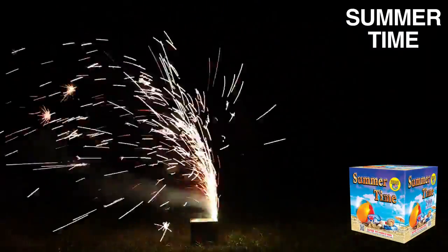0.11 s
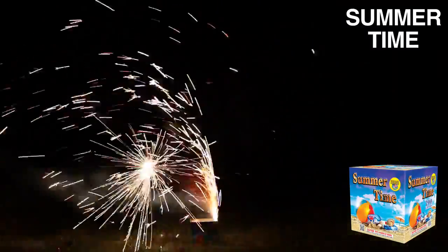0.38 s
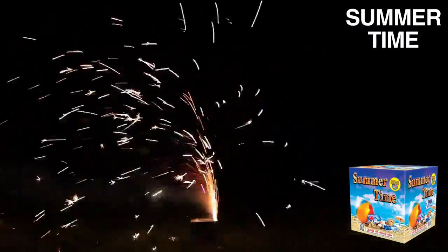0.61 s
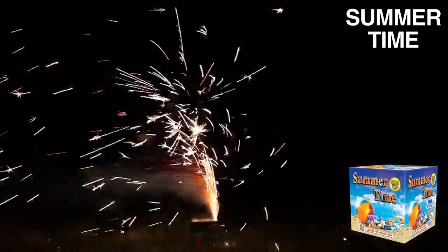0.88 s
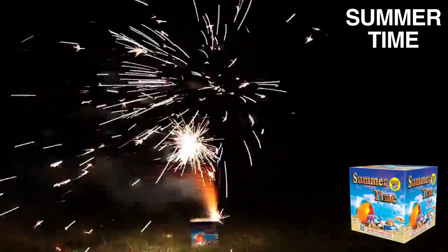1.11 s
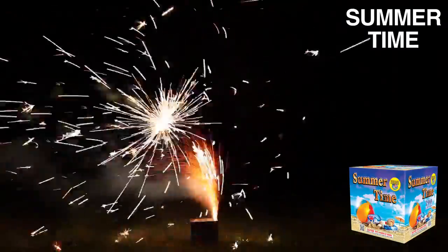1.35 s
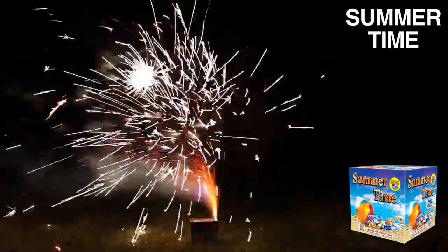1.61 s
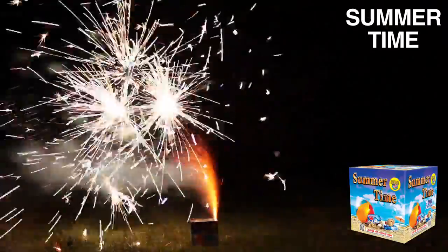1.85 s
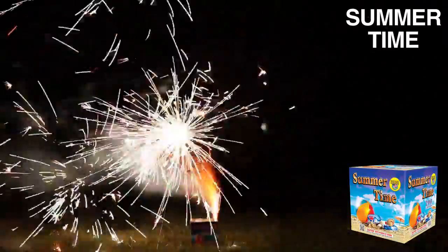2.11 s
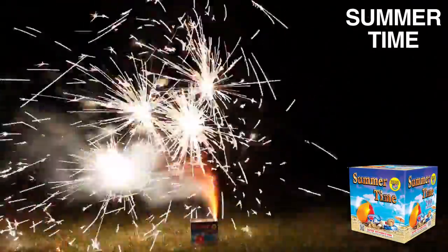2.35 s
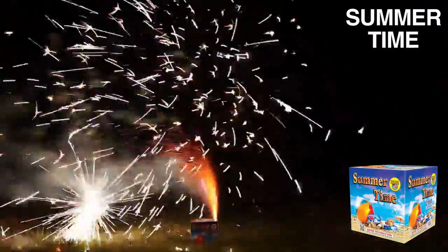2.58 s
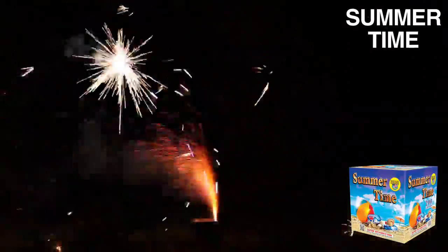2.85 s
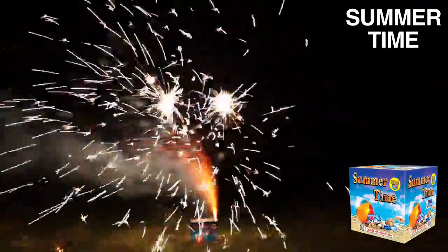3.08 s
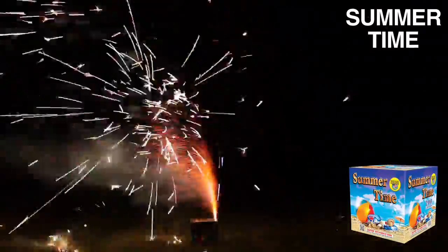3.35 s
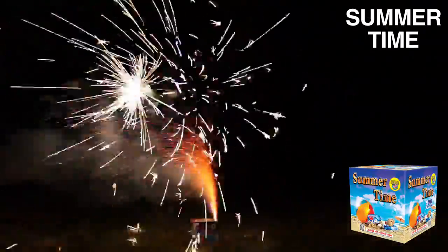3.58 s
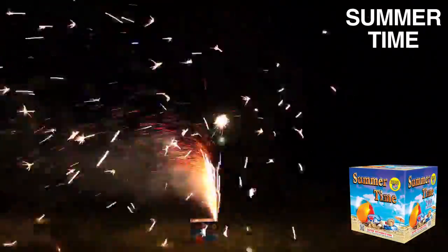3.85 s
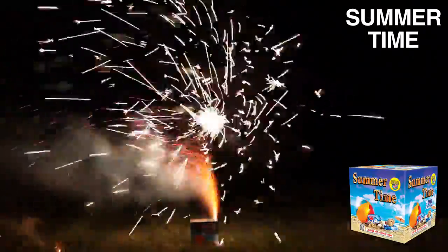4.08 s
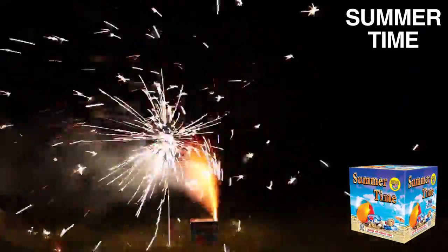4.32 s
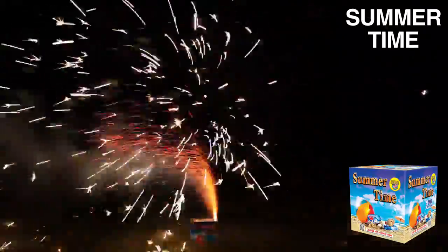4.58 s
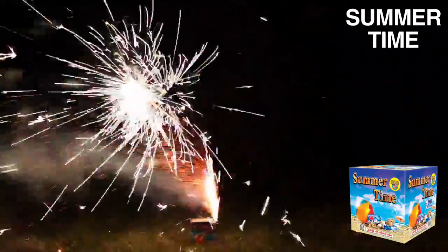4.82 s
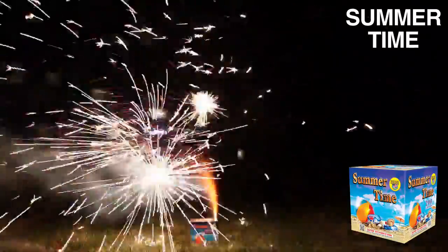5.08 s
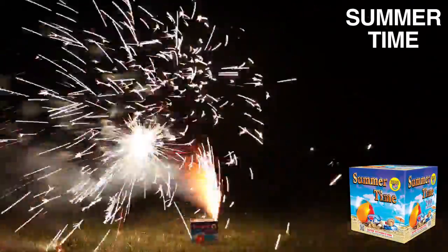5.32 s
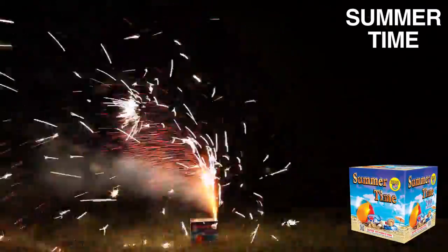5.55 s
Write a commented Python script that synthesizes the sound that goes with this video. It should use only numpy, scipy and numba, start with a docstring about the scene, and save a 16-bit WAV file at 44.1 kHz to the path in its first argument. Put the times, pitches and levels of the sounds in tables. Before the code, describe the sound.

Dense, dry, snapping firework crackles over a faint jet hiss, with short slapping echoes and occasional dull thumps in the grass.

```python
"""A ground fountain firework at night on a lawn.
First the jet hisses alone: noise in drifting patches, with tiny sparks snapping in it.
Soon the first star bursts above, the gain control turns the sound down, and the hiss swells and sinks.
Crackling follows to the end: each burst is a small shock wave, heard directly, off the ground, then from
walls further off. The shocks overload the microphone. Now and then a fallen star thumps in the grass."""
import sys
import numpy as np
from scipy import signal
from scipy.io import wavfile
from scipy.ndimage import uniform_filter1d
from numba import njit

SR = 44100
rng = np.random.default_rng(int(sys.argv[2]) if len(sys.argv) > 2 else 0)


def to_linear_factor(level_db):
    """Convert decibel levels (scalar or array-like) to linear amplitude factors."""
    exponent = np.asarray(level_db, float) / 20
    return 10 ** exponent


def to_wav(sig):
    """Store sig (one row per channel, or 1-D mono) as 16-bit WAV at the path in sys.argv[1].

    Samples outside -1..1 are clipped; the rate is SR.
    """
    pcm = np.clip(np.atleast_2d(sig), -1, 1) * 32767
    pcm = np.round(pcm).astype(np.int16)
    wavfile.write(sys.argv[1], SR, pcm.T)  # frames by channels


N = 250929

# Stars bursting in the air.
# Each row: start in seconds, strength in dB before the microphone, delay of the ground echo in ms.
POPS = [(0.1643, 9.5, 0.7), (0.342, 4.5, 0.96), (0.3718, -9, 0.75), (0.3788, -12, 0.57), (0.4328, -1, 0.3),
        (0.4733, 6.5, 0.7), (0.5205, 4.5, 0.83), (0.522, -3.5, 1.02), (0.5482, -6, 1.2), (0.597, -8, 0.39),
        (0.598, -8.5, 0.51), (0.6097, 1, 0.5), (0.636, 3, 0.82), (0.733, 1.5, 1.4), (0.8245, 1.5, 1.38),
        (0.8792, 6.5, 0.87), (0.9124, -6.5, 1.9), (0.9374, -2.5, 1.18), (0.986, -7, 0.97), (1.004, 8, 1.1),
        (1.0122, 3, 1.25), (1.025, 6.5, 0.93), (1.0309, 3, 0.77), (1.0727, 4, 1.04), (1.0973, 6, 1.14),
        (1.1626, 5, 1.29), (1.2126, -0.5, 0.84), (1.2323, 5, 0.43), (1.2568, 9.5, 1.2), (1.2841, 6.5, 1.18),
        (1.336, 4.5, 0.91), (1.3655, 3.5, 0.56), (1.3728, 9, 1.1), (1.4385, 7, 0.94), (1.4711, 3, 1.37),
        (1.4769, 3, 0.96), (1.5126, -4.5, 1.5), (1.5285, 7, 1.01), (1.5851, 3, 1.3), (1.5932, -5, 0.63),
        (1.6578, 2.5, 0.93), (1.6696, 6, 1.05), (1.6788, 6.5, 0.92), (1.7212, -2, 1.44), (1.7458, -6, 0.9),
        (1.767, -5, 0.84), (1.7741, 5, 1.6), (1.787, 3, 0.92), (1.7877, 7, 0.46), (1.8249, 8, 0.98),
        (1.835, 5.5, 1), (1.8477, 6, 1.34), (1.8736, 5.5, 2.13), (1.8911, 1.5, 0.78), (1.9174, 5, 1.24),
        (1.9325, 9.5, 0.98), (1.9349, -6, 0.99), (1.9529, 6.5, 1.1), (1.958, -4, 0.45), (2.0621, 2.8, 1.6),
        (2.0857, 4, 1.3), (2.1267, 7.8, 0.56), (2.1588, 6.5, 2.2), (2.177, 2, 0.6), (2.1868, 1, 0.91),
        (2.1995, 10.5, 0.87), (2.2126, 8.5, 1.94), (2.2396, 4, 0.94), (2.252, 7, 1.27), (2.29, -6, 1.4),
        (2.3452, 11, 0.85), (2.351, 8, 1.2), (2.3712, 10, 0.75), (2.373, 6, 1.1), (2.3787, 7.5, 0.54),
        (2.393, 8.5, 0.75), (2.4264, 9, 1.2), (2.4286, -3, 0.94), (2.4397, 6, 0.66), (2.442, 7, 1.12),
        (2.459, 9.5, 0.96), (2.4622, -4, 1.1), (2.4651, 4, 1.32), (2.488, 7.5, 1.24), (2.5354, 2, 1),
        (2.541, -4, 0.76), (2.544, 3, 1), (2.5487, 4.5, 1.3), (2.5586, 2, 0.98), (2.5638, 5.5, 1.04),
        (2.588, 7.5, 1.36), (2.6143, 6, 0.9), (2.6286, 7.5, 1.46), (2.676, 8, 0.4), (2.7229, 6, 1.5),
        (2.7366, -5, 0.82), (2.7409, 2, 1.52), (2.9406, 7, 1.41), (3.0299, 4.5, 0.55), (3.0397, 8, 1.48),
        (3.0702, 6, 1.0), (3.0737, 7.5, 1.03), (3.0783, 4, 1.2), (3.097, 7.5, 1.34), (3.125, 9.5, 0.85),
        (3.177, -4, 1.2), (3.1854, 5.5, 1.15), (3.21, 8.5, 1.18), (3.2376, 8.5, 1.52), (3.2562, 3, 1.73),
        (3.282, -4, 1.54), (3.3276, 4.5, 1.48), (3.3593, 5.5, 0.82), (3.4087, 5, 1.1), (3.4467, 10, 1.88),
        (3.4597, 4.5, 1.22), (3.4645, -1, 0.96), (3.5625, 8.5, 1.16), (3.6376, 8.5, 1.18),
        (3.6657, 2, 1.21), (3.741, 7, 1.18), (3.7856, 5.5, 1.52), (3.7938, 4.5, 1.17), (3.7963, 7.5, 1.3),
        (3.8119, 4, 1.26), (3.8124, 8.5, 0.92), (3.8146, 4, 0.54), (3.957, 1.5, 1), (3.9901, 9, 1.39),
        (3.9954, 7, 1.52), (4.055, 0.5, 0.75), (4.1129, 8, 0.9), (4.1148, 7.5, 0.23), (4.121, 5, 1.42),
        (4.1383, 8, 0.67), (4.1504, -7.4, 0.97), (4.2614, -1.5, 1), (4.2691, 4, 1.2), (4.2764, 9, 1.0),
        (4.291, 10, 1.1), (4.3077, 6.3, 1.09), (4.3914, 2.5, 0.88), (4.4299, 6, 1.16), (4.4541, 8.5, 1.16),
        (4.4675, 6.5, 0.96), (4.4709, 8, 0.81), (4.4815, 2, 1.4), (4.4986, 2, 1.2), (4.5217, 2, 0.96),
        (4.5267, 2, 0.94), (4.5405, 1.5, 0.74), (4.5769, 5.5, 1.06), (4.6338, 6, 1.17), (4.7104, 7, 0.61),
        (4.712, 0, 1.4), (4.7238, 8.5, 0.79), (4.7638, 7.5, 0.66), (4.766, -1, 0.45), (4.7781, 5.5, 0.7),
        (4.7794, 5.5, 1.25), (4.8656, 8.5, 1.23), (4.8877, 7, 1.26), (4.8942, 1.5, 1.3),
        (5.001, 10.5, 0.82), (5.0713, 9, 1.1), (5.0756, 7, 1.05), (5.1073, 8, 1.22), (5.1555, 7.5, 0.84),
        (5.178, 8, 0.67), (5.1867, 8, 1.3), (5.1952, 5.5, 1.36), (5.2108, 7, 1.16), (5.2246, 8, 0.9),
        (5.269, 7.5, 0.61), (5.276, 3, 0.94), (5.2895, 5.5, 0.89), (5.347, 12, 1.33), (5.3547, 6.5, 1.1),
        (5.364, 6, 0.87), (5.3924, -5.3, 2), (5.4215, 5, 1.17), (5.4288, 5.5, 0.79), (5.4538, -6, 0.83),
        (5.4602, 4.5, 1.28), (5.5012, 8, 0.74), (5.5753, 7, 0.64), (5.5846, 0.5, 0.38), (5.5909, -5.5, 1.5),
        (5.661, 10.5, 1.33), (5.6635, 2.5, 0.96)]
SHOCK_MS = 0.099  # typical time from the jump of a shock to its fall through zero, at 0 dB


def evened(x):
    """Scales a signal to an rms of 1."""
    return x / np.sqrt(np.mean(x ** 2) + 1e-20)


def read(points, hz):
    """Reads a curve of (Hz, dB) points at any frequency, along a logarithmic frequency scale."""
    f, value = np.transpose(points)
    return np.interp(np.log(hz + 1), np.log(f + 1), value)


def causal(points, size=2048):
    """Impulse response of minimum phase with the given colour: nothing sounds before its cause."""
    log_gain = read(points, np.fft.rfftfreq(size, 1 / SR)) * np.log(10) / 20
    circle = np.concatenate([log_gain, log_gain[-2:0:-1]])
    spectrum = np.exp(np.conj(signal.hilbert(circle)))
    return np.fft.ifft(spectrum).real[:size // 2]


def shock(ms, phase_ms, rise_ms=0.027):
    """Blast wave: a jump in pressure, a fall through zero and a longer suction."""
    u = np.maximum(ms, 0) / phase_ms
    jump = np.clip(ms / rise_ms + .5, 0, 1)
    return jump * (1 - u) * np.exp(-.7 * u)


def after(s, size=600):
    """First sample, just before the moment s, and the time of each sample in ms since that moment."""
    first = int(s * SR) - 2
    return first, ((first + np.arange(size)) / SR - s) * 1000


def add(mix, first, sound):
    """Adds a sound to the mix from sample first on, cut off at the end of the mix."""
    part = mix[first:first + len(sound)]
    part += sound[:len(part)]


def surroundings():
    """Eight echo patterns: noise shaped by dense scatter, clusters from walls and a faint tail."""
    # Scattered echoes from walls. Each row: delay in ms, energy in dB, spread in ms.
    walls = [(6.14, -18.5, 0.96), (12.18, -21.5, 1.3), (20.6, -36.5, 3.6)]
    scatter_db, scatter_t60_s = -9.5, 0.017  # smoke, grass and sparks smear each shock
    yard_db, yard_t60_s = -17.5, 0.11  # faint diffuse tail
    ms = np.arange(SR // 4) * 1000 / SR
    power = np.zeros(len(ms))  # energy per ms
    for at, db, wide in walls:
        power += to_linear_factor(2 * db) * np.exp(-(ms - at) / wide) * (ms > at) / wide
    for db, t60 in ((scatter_db, scatter_t60_s), (yard_db, yard_t60_s)):
        fade = to_linear_factor(-120 * ms / 1000 / t60) * (ms > .3)
        power += to_linear_factor(2 * db) * fade / fade.sum() * SR / 1000
    return np.sqrt(power * 1000 / SR) * rng.standard_normal((8, len(ms)))


def far(s, db):
    """Echoes of bursts: different places stir different patterns, and walls and grass swallow treble."""
    echoes, out = surroundings(), np.zeros(N)
    for k, (start, gain) in enumerate(zip(s, to_linear_factor(db))):
        add(out, int(start * SR), gain * echoes[k % len(echoes)])
    out = signal.lfilter(*signal.butter(1, 9450, fs=SR), out)
    # after() begins two samples early, so two samples are skipped
    return signal.oaconvolve(out, shock(after(0)[1], SHOCK_MS))[2:N + 2]


def jet_hiss():
    """Turbulent gas: coloured noise in drifting patches that flutters."""
    # Colour of the hiss, with its own notch from the ground. Each row: frequency in Hz, relative dB per Hz.
    hiss_colour = [(30, 4), (130, 11.5), (350, 5), (700, 6), (1210, -5.5), (2200, -2.5), (3650, -5.5),
                   (4700, -11), (5450, -25), (6300, -14), (10700, -25.5), (16000, -41)]
    patches_db, flutter_db = 2.0, 0.76
    frames, hz = N // 128 + 5, np.fft.rfftfreq(512, 1 / SR)
    a, b, patches = rng.standard_normal((frames, 257, 3)).T
    # smooth over neighbouring frequencies, then over time
    patches = evened(uniform_filter1d(uniform_filter1d(patches, 8, 0), 16, 1))
    flutter = evened(uniform_filter1d(rng.standard_normal(frames), 4))
    level_db = read(hiss_colour, hz)[:, None] + patches_db * patches + flutter_db * flutter
    spectrum = (a + 1j * b) * to_linear_factor(level_db)
    return evened(signal.istft(spectrum, nperseg=512, noverlap=384)[1][:N])


def jet_sparks():
    """Tiny sparks snap at random in the plume, each the slope of a small shock."""
    sparks_per_s, sparks_db = 350, -65.5  # average rate, rms level
    size = to_linear_factor(3.6 * np.minimum(rng.exponential(1, N), 5))  # a few sparks are much stronger
    size *= rng.random(N) < sparks_per_s / SR
    snaps = signal.oaconvolve(size, shock(after(0)[1], phase_ms=0.12))[:N + 1]
    return to_linear_factor(sparks_db) * evened(np.diff(snaps))


def burning():
    """Strength of the burning over time, as a gain for the hiss, with a slow waver."""
    # Each row: time in seconds, level of the hiss in dB before the waver.
    burn = [(0, -42), (.12, -38), (.3, -34.5), (.5, -42.5), (5.69, -43)]
    waver_db, waver_s = 1.0, .3
    waver = evened(uniform_filter1d(rng.standard_normal(N), int(waver_s * SR), mode="wrap"))
    return to_linear_factor(np.interp(np.arange(N) / SR, *np.transpose(burn)) + waver_db * waver)


def jet():
    """The burning gas hisses, and sparks snap in it at a steady average rate."""
    hiss = jet_hiss()
    sparks = jet_sparks()
    return burning() * hiss + sparks


def grass():
    """Fallen stars burst in the grass: a muffled crack, and the soft ground gives one deep swing."""
    # Each row: start in seconds, level of the crack in dB, level of the thump in dB.
    fallen_stars = [(0.892, -10, -10), (1.5489, -10, -9.5), (2.7005, 3.5, 0.5), (3.3215, -1, 4),
                    (3.7604, -18, -20), (3.8957, -7, -15.5), (4.041, -15, -22), (4.337, -14, -11),
                    (4.7523, -8, -13), (4.8223, -31, -17), (4.9138, -5, -11), (5.3998, -14, -15)]
    out = np.zeros(N)
    for s, crack_db, thump_db in fallen_stars:
        first, ms = after(s)
        crack = shock(ms, phase_ms=0.17, rise_ms=0.075)
        turns = np.maximum(ms, 0) * 433 / 1000  # the first full swing lasts 1/433 s
        thump = np.sin(2 * np.pi * turns ** 0.56) * np.exp(-1.6 * turns)  # pitch falls
        add(out, first, to_linear_factor(crack_db) * crack + to_linear_factor(thump_db) * thump)
    return out + far(*np.transpose(fallen_stars)[:2])


def faint_pops():
    """Small or distant stars at random from the first burst on, as rows like those of POPS."""
    per_s, middle_db, spread_db = 3, -17.5, 4
    low_ms, high_ms = 0.48, 1.62  # range of the ground echo's delay
    gap, size, height = rng.random((60, 3)).T
    s = POPS[0][0] - np.cumsum(np.log(1 - gap)) / per_s
    db = middle_db + spread_db * (2 * size - 1)
    delay_ms = low_ms + (high_ms - low_ms) * height
    return np.transpose([s, db, delay_ms])[s < N / SR]


def stars():
    """Each burst arrives direct and off the ground; no two have quite the same length or reflection."""
    growth = 0.1  # a stronger burst is longer, as strength to this power
    ground_db, ground_stretch, ground_rise_ms = -3, 1.227, .09  # grass weakens the echo and draws it out
    pops = np.concatenate([POPS, faint_pops()])
    out, chance_db = np.zeros(N), 1.07 * rng.standard_normal((400, 2))
    for (s, db, delay_ms), (long_db, soft_db) in zip(pops, chance_db):
        first, ms = after(s)
        phase_ms = SHOCK_MS * to_linear_factor(growth * db + long_db)
        direct = shock(ms, phase_ms)
        ground = shock(ms - delay_ms, ground_stretch * phase_ms, ground_rise_ms * to_linear_factor(2 * soft_db))
        add(out, first, to_linear_factor(db) * (direct + to_linear_factor(ground_db) * ground))
    return out + far(*pops.T[:2])


def scene():
    """The stars in the air, the stars in the grass and the jet together, in one channel."""
    return (stars() + grass() + jet())[None]


def microphone(sound):
    """The microphone colours the sound, overloads unevenly on strong shocks and loses the deepest bass."""
    # Colour of the microphone. Each row: frequency in Hz, gain in dB.
    response = [(30, -26), (150, -8.5), (500, -3), (2500, 4.5), (4200, 10), (4900, 9), (5450, 6.5),
                (6300, 9), (8000, 1.5), (10700, 4.5), (13500, 11), (16500, -5)]
    heard = signal.oaconvolve(sound, causal(response))[:N]
    heard = np.clip(heard, -.9, 1)
    return signal.lfilter(*signal.butter(1, 60, "high", fs=SR), heard)


@njit
def follow(level_db, start_db, grab, ease_db):
    """Peak follower: jumps towards louder sound, sinks slowly."""
    out, held = np.empty_like(level_db), start_db
    for i in range(len(level_db)):
        if level_db[i] > held:
            held += grab * (level_db[i] - held)
        else:
            held -= ease_db
        out[i] = held
    return out


def gain_control(heard):
    """Turns the sound down quickly after a peak, then up again by 3 dB per second."""
    level_db = 20 * np.log10(abs(heard) + 1e-9)
    held_db = follow(level_db, start_db=-17.0, grab=0.035, ease_db=3. / SR)
    late_db = np.concatenate([np.full(40, held_db[0]), held_db[:-40]])  # it reacts 40 samples late
    return heard * to_linear_factor(-8.2 - late_db)


def low_pass(x):
    """Removes everything above the highest recorded frequency."""
    return signal.sosfilt(signal.butter(12, 16810, fs=SR, output="sos"), x)


def record(dry):
    """Microphone, gain control, a limit to the treble and a clip at full scale."""
    out = gain_control(microphone(dry[0]))
    out = signal.oaconvolve(out, signal.firwin(151, 16700, fs=SR), "same")
    out = np.clip(out, -1, 1)
    return low_pass(out[None])


dry = scene()
out = record(dry)
to_wav(out)
```